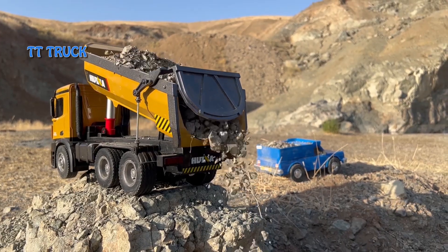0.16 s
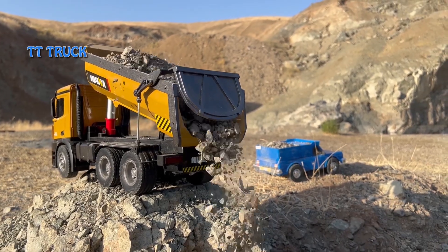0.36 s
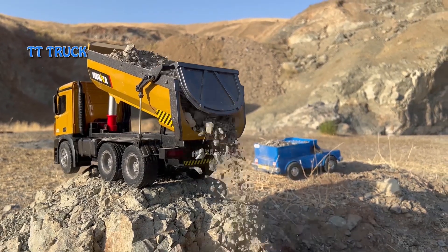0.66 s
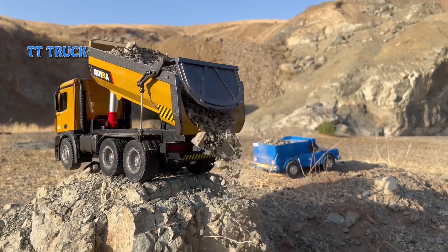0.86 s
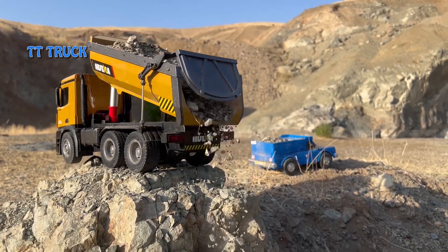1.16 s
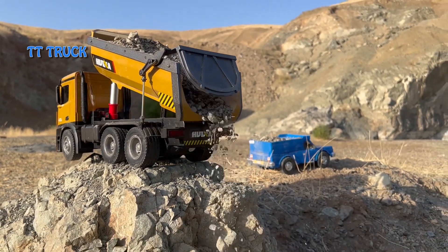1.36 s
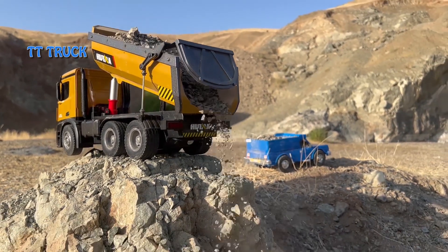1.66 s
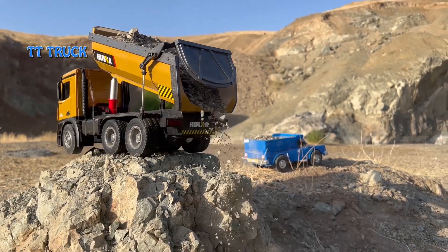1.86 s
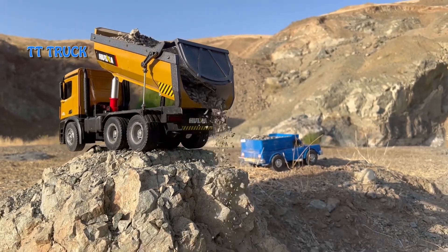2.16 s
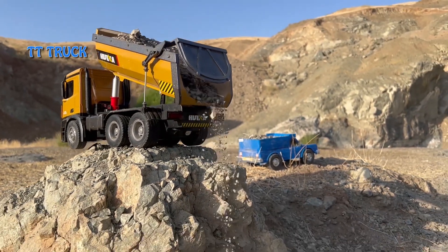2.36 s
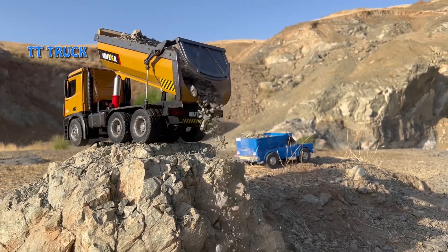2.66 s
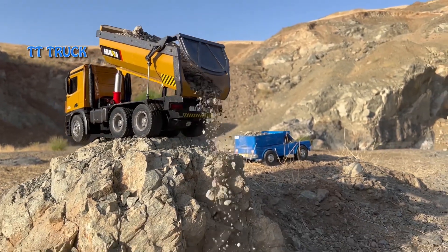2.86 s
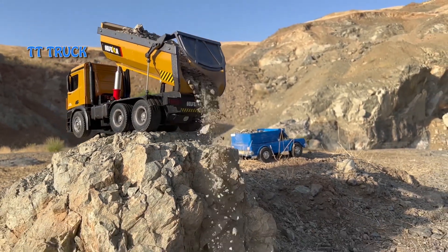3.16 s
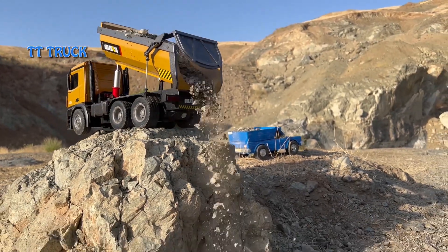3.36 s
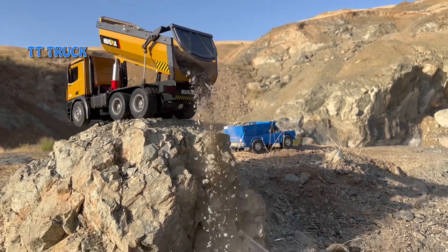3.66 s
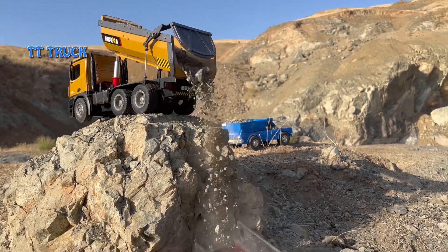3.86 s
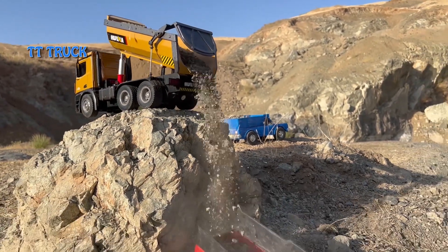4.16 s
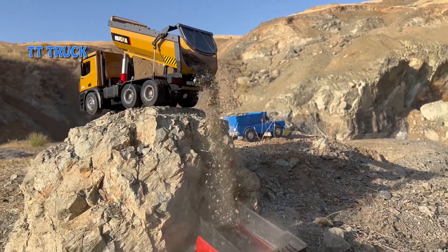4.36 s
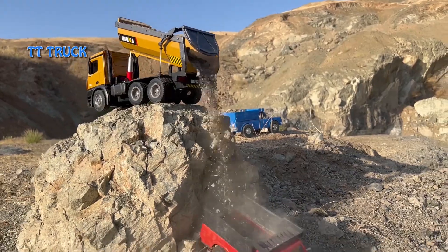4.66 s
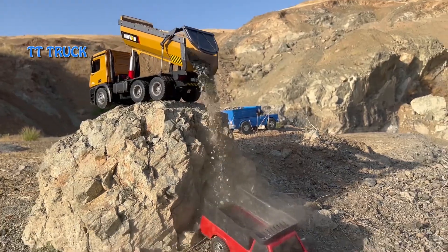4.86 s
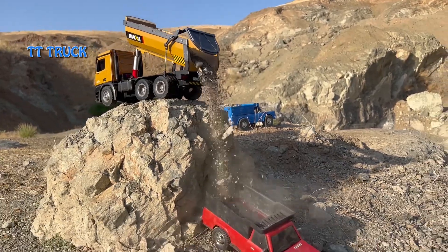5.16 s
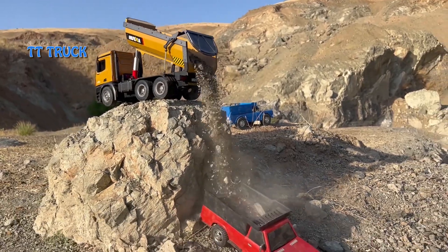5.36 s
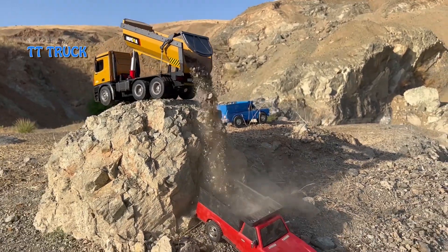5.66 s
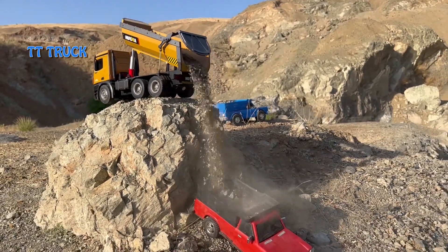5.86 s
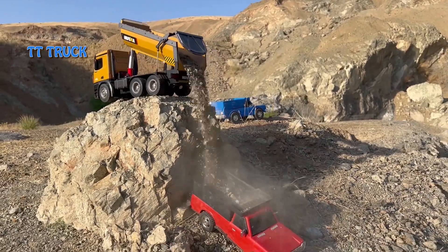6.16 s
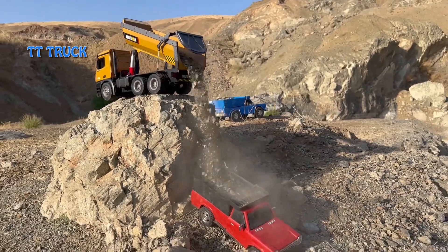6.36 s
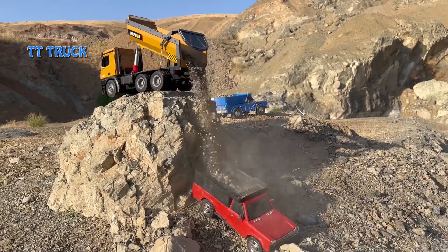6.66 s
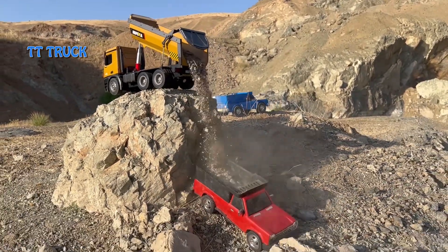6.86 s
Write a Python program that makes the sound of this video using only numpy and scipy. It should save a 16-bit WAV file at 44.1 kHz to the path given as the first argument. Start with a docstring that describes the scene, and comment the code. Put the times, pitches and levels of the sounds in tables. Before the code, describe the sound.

Small stones clatter densely against a rock face, sharp and dry with short woody thuds, while fine gravel hisses and ticks around them. The hollow toy truck bed rumbles softly, drifting slightly left. The clatter steadily weakens into scattered clicks, grit and a soft swish of sand near the end. It is open air with no obvious echo, heard close in stereo, with gentle low wind on the microphone.

```python
"""Stones knock hard in a tipped toy truck bed as gravel pours out of it, outdoors. Each knock is a blow that
rings a few resonances; pebbles, stones and grit are bursts of coloured noise. The load rumbles in the hollow
bed: noise through resonances that trade strength as it empties. Behind it, sand sifts, and wind blows on two
microphone ports as low noise with puffs that fall in pitch."""
import sys
import numpy as np
from scipy import signal
from scipy.fft import rfft, irfft, next_fast_len
from scipy.io import wavfile

SR = 44100
rng = np.random.default_rng(int(sys.argv[2]) if len(sys.argv) > 2 else 0)


def master(y):
    """Save y as 16-bit WAV."""
    cut = np.clip(np.atleast_2d(y).T, -1, 1)
    pcm = np.round(cut * 32767)  # scale
    wavfile.write(sys.argv[1], SR, pcm.astype(np.int16))


N = 309641   # length in samples, about 7 seconds


def from_db(db):
    """Decibels to gain."""
    return 10 ** (np.asarray(db) / 20)


def rms_one(x):
    """Scale to an average strength (rms) of 1."""
    return x / np.sqrt(np.mean(x ** 2) + 1e-20)


def in_time(rows):
    """Turn a table that starts with start_s into curves with one value a sample."""
    s, *columns = np.transpose(rows)
    return [np.interp(np.arange(N) / SR, s, column) for column in columns]


def colour(x, spectrum):
    """Filter with the given spectrum, sounding as early as it can (minimum phase)."""
    hz, db = np.transpose(spectrum)
    grid = np.maximum(np.arange(4097) * SR / 8192, 1)
    gain = from_db(np.interp(np.log(grid), np.log(hz), db))
    cepstrum = irfft(np.log(gain))
    # Folding the second half onto the first leaves no sound before time zero.
    cepstrum[1:4096] *= 2
    cepstrum[4097:] = 0
    response = irfft(np.exp(rfft(cepstrum)))
    return signal.oaconvolve(x, response[None], axes=1)[:, :N]


def resonance(x, hz, width_hz):
    """Ring at one pitch, with gain 1 at the top; a narrow width rings longer."""
    r = np.exp(-np.pi * width_hz / SR)
    top = np.array([1, 0, -1]) * (1 - r * r) / 2
    return signal.lfilter(top, [1, -2 * r * np.cos(2 * np.pi * hz / SR), r * r], x)


def contacts(per_s, spread_db, t60):
    """Envelope of random contacts of uneven size, each falling 60 dB in t60 seconds."""
    sizes = from_db(spread_db * np.minimum(rng.exponential(1, N), 3.2))
    hits = sizes * (rng.random(N) < per_s / SR)
    return rms_one(signal.lfilter([1], [1, -from_db(-60 / (t60 * SR))], hits + 1e-18))


def patter(envelope, hush_db):
    """Bursts of noise over a steady hush; two unrelated copies, for shared and scattered sound."""
    return (envelope + from_db(hush_db)) * rng.standard_normal((2, N))


# Larger stones landing: start_s [s], level_db [dB], stone_pitch_hz [Hz], ring_width_hz [Hz],
# thud_pitch_hz [Hz], thud_db and crack_db [dB relative to level_db]
LARGE_STONES = [(0.0055, -5, 1840, 400.0, 1000.0, -12, -16.0), (0.0093, -16, 1790, 260.0, 1000, -10, -27),
                (0.0197, -2, 1970, 140.0, 930, -3.5, -23), (0.0377, -6, 2150.0, 220.0, 970, -14.5, -13),
                (0.0788, -13.5, 2150, 300.0, 960, -2, -13), (0.0965, -9.5, 2010, 400.0, 895, -3, -16),
                (0.1448, -10, 2230, 350.0, 750.0, -13, -17), (0.1532, -15, 1970, 110.0, 644, -3.0, -17),
                (0.1597, -5.5, 1590, 260.0, 980.0, -7, -16), (0.1793, -21, 1510.0, 360.0, 710.0, -17, -8),
                (0.1846, -2.5, 4000, 420.0, 1000, -9, -16), (0.196, -13, 2280.0, 400.0, 605, -6, -9),
                (0.2399, 0.5, 2050, 120.0, 614, -10, -17), (0.2601, -2, 2010.0, 650.0, 1010, -4, -14.5),
                (0.2668, -4.0, 2200, 680.0, 950, -6, -17), (0.2803, -6, 2120.0, 270.0, 930.0, -15, -14),
                (0.2904, -6.5, 4300, 110.0, 930.0, -20, -10), (0.3091, -1, 2070, 270.0, 755, -5.5, -28),
                (0.3415, -19, 2100.0, 400.0, 950.0, -15, -20), (0.3495, -15, 2200.0, 500.0, 810, 3, -24),
                (0.3555, -7, 2070, 860.0, 980.0, -21, -25), (0.3689, -2.5, 2030, 400.0, 930, 1, -24),
                (0.3825, -23, 2000.0, 400.0, 894, -5, -7), (0.3995, -6, 2770.0, 760.0, 820, 6.5, -20),
                (0.4265, -3, 2120, 400.0, 900.0, -20, -21), (0.4301, -0.5, 1820, 380.0, 510.0, -32.0, -15),
                (0.4545, -13, 2010, 600, 950, -6, -17), (0.4639, -8, 2230.0, 540.0, 970.0, -8.0, -26),
                (0.472, -15, 2000.0, 400.0, 804, -3, -22), (0.4844, -1, 1670.0, 540.0, 716, -4, -15),
                (0.4922, -5, 1680.0, 350.0, 940.0, -5, -22.0), (0.5173, -7, 1710, 250.0, 930, 0, -32),
                (0.5367, 3.5, 1830, 300.0, 590, -7.5, -15.5), (0.5483, -5, 2110, 270.0, 1030.0, -19, -31),
                (0.5623, -20.5, 2160.0, 360.0, 930, 15.5, -33), (0.5685, -10, 2100, 400, 940, 5, -28),
                (0.5912, -11, 1400.0, 680.0, 930.0, -9, -35), (0.6124, -5, 2220.0, 400.0, 950, -1, -30),
                (0.6255, -7.5, 1690, 390.0, 970, -1.5, -34), (0.6491, -7, 2150.0, 160.0, 970.0, -25, -12),
                (0.6885, -11.5, 2220, 100.0, 950, -4, -4.5), (0.7239, -4, 1720.0, 500.0, 820, -18, -37),
                (0.7334, -9, 1600, 220.0, 805, -7, -13), (0.7505, -7, 3510.0, 680.0, 950.0, -18, -24),
                (0.8044, -19, 2270.0, 310.0, 930.0, -13, -8), (0.8118, -14, 4170, 130.0, 800.0, -11, -17),
                (0.8763, -25, 1710.0, 270.0, 1000, 12, -24.0),
                (0.9152, -7.5, 3690.0, 450.0, 1000.0, -9, -19),
                (0.9548, -13, 1580.0, 390.0, 810.0, -14, -16), (0.9852, -15, 2280, 500.0, 840.0, -9, -16),
                (0.9901, -6, 2250, 720.0, 804, -20, -17), (0.9978, -5.5, 2080.0, 590.0, 940, 1, -26.0),
                (1.0502, -12, 3110.0, 430.0, 960, -3, -20), (1.0585, -12, 1590, 200.0, 920, -3, -12),
                (1.086, -14, 1620, 260.0, 590, 0.5, -6), (1.1229, -24, 1720.0, 280.0, 920.0, -14, -1),
                (1.1354, -11, 1640, 610.0, 740, -8, -9), (1.1617, -13, 1670.0, 720.0, 884, 1, -9),
                (1.1685, 1, 2190, 420.0, 593, -10, -24), (1.1724, -17, 1600, 500, 850, 2, -18),
                (1.2136, -12.5, 1390.0, 480.0, 660.0, -16, -11),
                (1.2313, -18.5, 3650.0, 810.0, 800.0, -14, -9), (1.2831, -9.5, 4330, 650.0, 905, -2, -13.5),
                (1.2945, -15, 2080.0, 210.0, 660.0, -3.5, -26), (1.3111, -22, 1410, 120.0, 870, 1, -17.0),
                (1.3231, -25, 1550.0, 720.0, 930, 2, -9), (1.3445, -16.5, 2120, 140.0, 810.0, -3, -17),
                (1.355, -18, 3730.0, 480.0, 1020.0, -18, -13),
                (1.3753, -16.5, 2400.0, 390.0, 950.0, 3, -11), (1.3885, -17, 2240, 400, 947, -2, -17),
                (1.3969, -18, 2230.0, 810.0, 750.0, -25.0, -14), (1.4165, -27, 2380.0, 290.0, 890.0, -6, 0),
                (1.4289, 2, 2060, 1400.0, 650, -9, -21), (1.4298, -11, 4200, 700, 950, -8, -25),
                (1.4432, -25, 3900.0, 1200.0, 900, -11, -10), (1.48, -12, 1800.0, 520.0, 826, 2, -26),
                (1.5287, -22, 2240, 90.0, 930.0, -13, -4), (1.5531, -23.5, 2200.0, 520.0, 950, 5, -15.0),
                (1.6071, -19, 2050, 300.0, 940, -2, -7), (1.6345, -16.5, 4200, 200.0, 990, -19, -14),
                (1.6415, -21.5, 1540, 420.0, 830, 7, -22), (1.7379, -17, 2060.0, 720.0, 980, -5, -14),
                (1.8024, -24, 1600, 350.0, 930, 9, -25), (1.8283, -21, 1670.0, 560.0, 930, 1, -7.5),
                (1.9045, -14.5, 1980, 810.0, 950, -8, -13), (1.9851, -23, 1570.0, 380.0, 1000.0, -15, -13),
                (2.0547, -27, 4120.0, 480.0, 940.0, -15, -9), (2.3057, -19.5, 1570, 150.0, 960.0, -19, -29),
                (2.3341, -15, 1730, 450.0, 724, -5.5, -19), (2.4368, -23, 1590.0, 390.0, 680.0, -3, -24),
                (2.4598, -15.5, 1570, 260.0, 1000, -8, -25), (2.4751, -16, 4300, 110.0, 824, -7, -13.5),
                (2.5953, -22, 1660, 400, 900, -6, -19), (2.6447, -21.5, 1540.0, 290.0, 610.0, -15, -10.5),
                (2.6607, -8.5, 1680, 310.0, 920, -6, -29), (2.6731, -14, 4000, 260.0, 940.0, -6, -22),
                (2.7878, -20, 1480, 400, 800, -16, -8), (2.8538, -15, 1600, 370.0, 975, 1, -34),
                (2.9545, -20, 1600, 400, 900, -11, -22), (2.975, -18, 1610, 560.0, 950, 2.5, -25.0),
                (3.0801, -23.5, 1520, 540.0, 970.0, -8, -9),
                (3.1683, -17.5, 3700, 360.0, 810.0, -16, -14.5), (3.2373, -26, 3680, 340.0, 620.0, -6, -18),
                (3.3298, 0.5, 1620, 230.0, 1070, -5.5, -36), (3.3941, -24.5, 1950.0, 560.0, 930.0, 6, -3),
                (3.4068, -21.5, 1950, 160.0, 1050, 4, -23.0), (3.4859, -17.5, 1550, 270.0, 960.0, -19, -18),
                (3.5047, -28, 1670.0, 310.0, 990.0, 1, -22), (3.5369, -20, 2090.0, 610.0, 910, 6.5, -24),
                (3.5525, -25, 2020, 400, 1010, -10, -18), (3.6286, -14.5, 2920.0, 720.0, 1040, -10, -24),
                (3.6654, -20, 1600, 230.0, 775, 2.5, -8.5), (3.7803, -19, 1680, 310.0, 590.0, -8, -22),
                (3.8651, -19, 1650.0, 650.0, 1010.0, -8, -25),
                (4.039, -19, 1670.0, 680.0, 980.0, -17, -12.5),
                (4.0603, -21, 1640.0, 810.0, 1040.0, -9, -27), (4.0809, -29, 1540.0, 680.0, 786, 7, -25.0),
                (4.099, -3.5, 2860, 2380, 695, -4, -43), (4.1022, -9.5, 1750, 260.0, 690, -25, -32),
                (4.1941, -29.5, 1610.0, 400.0, 840, 5.5, -20.0), (4.2292, -23.5, 3600, 150.0, 960, -2, -12),
                (4.3024, -23.5, 1720.0, 610.0, 1030.0, -10, -10),
                (4.4439, -17.5, 2300, 1500.0, 1040.0, -12, -31), (4.582, -25, 2030, 760.0, 830, 2.5, -20),
                (4.6529, -23, 1990.0, 400.0, 544, -6, -15), (4.6918, -26.5, 1900, 90.0, 540, -1, -7),
                (4.7119, -20.5, 2860, 590.0, 700.0, -3, -23), (4.7597, -25, 1650.0, 360.0, 910, 4, -20),
                (5.0515, -27, 2040, 240.0, 840.0, -12, -22), (5.0569, -23.5, 2120, 290.0, 930, 3, -24),
                (5.2513, -24, 4000, 350.0, 676, -4, -5.5), (5.3418, -24.5, 2010, 180.0, 580, 8.5, -13),
                (5.3498, -31.5, 1260.0, 720.0, 704, 20, -13.0), (5.4014, -25, 2860.0, 760.0, 1050, 2, -15),
                (5.4277, -19.5, 2840, 590.0, 960.0, -5, -10.5),
                (5.4644, -25, 4030.0, 720.0, 800.0, -2, -10), (5.6996, -32, 3600, 370.0, 583, -7, -9),
                (5.7084, -34, 2010.0, 590.0, 830.0, 5, -1), (5.7302, -25, 3900, 520.0, 690.0, -10, -20),
                (5.805, -29.5, 3900, 600, 800, -6, -12), (5.871, -27, 2930, 900.0, 610.0, -9, -12),
                (5.914, -34, 2000, 900, 800, -6, -7), (5.962, -30, 1500, 600, 844, -2, -9),
                (5.992, -32, 1600, 600, 850, -4, -13), (6.1575, -26, 3730, 610.0, 670.0, -6, -13),
                (6.179, -38, 1900.0, 400.0, 355, 9, -2), (6.2466, -25, 1850, 270.0, 950, 0, -14),
                (6.2921, -27, 4040, 170.0, 870, -1, -14), (6.384, -42, 1900.0, 400.0, 334, 12.5, -12.0),
                (6.3985, -33, 3000.0, 700.0, 695, 8, -3.5), (6.4358, -37, 1590, 180.0, 620.0, 11, -1),
                (6.622, -29.5, 2500, 290.0, 705, -5, -12), (6.6581, -33, 4020.0, 190.0, 860.0, -2.0, -17.0),
                (6.7316, -25.5, 3150, 760.0, 680.0, -23.0, -21), (6.9265, -36.5, 3000.0, 800.0, 655, 5, -7)]
# What every blow rings besides the stone, low and high: pitch_hz [Hz], width_hz [Hz], level_db [dB]
THUD_MODES = [(468, 89, -16.5), (628, 52, -5.5), (882, 20, -7.5)]
SNAP_MODES = [(1600, 47, -13), (2150, 290, -13), (3600, 1050, -19)]
UNEVEN_DB = -6.5   # size of the random change in a mode's share from blow to blow; the sign is immaterial


def ring_modes(blow, modes):
    """One blow rings several resonances, in shares that vary at random."""
    return sum(from_db(db + UNEVEN_DB * rng.standard_normal()) * resonance(blow, hz, width)
               for hz, width, db in modes)


def knocks(rows):
    """A soft-edged blow with a noisy tail rings the stone and damped modes; a short crack lies on top."""
    size = 3000   # samples kept for each knock
    rung, crack = np.zeros((2, N + size)), np.zeros(N + size)
    t = np.arange(size) / SR
    contact = signal.butter(2, 4200, fs=SR)   # the contact lasts a fraction of a millisecond
    for s, db, stone_hz, width_hz, thud_hz, thud_db, crack_db in rows:
        rebounds = 0.045 * rng.standard_normal((2, size)) * from_db(-60 * t / 0.016)
        blow = rebounds + [[1], [.3]] * (np.arange(size) == 1)
        blow = signal.lfilter(*contact, blow)
        low = ring_modes(blow, THUD_MODES)
        high = ring_modes(blow, SNAP_MODES) + resonance(blow, stone_hz, max(width_hz, 40))
        low = low + resonance(blow, thud_hz, 0.15 * thud_hz)
        low = np.roll(low, 24, axis=1)   # the thud comes half a millisecond late
        thud = from_db(thud_db) * low / abs(low[0]).max()
        ring = high / abs(high[0]).max()
        at = max(round(s * SR) - 4, 0)
        rung[:, at:at + size] += from_db(db) * (thud + ring)
        crack[at:at + size] += from_db(db + crack_db - 60 * (t - .0015) / 0.015)
    no_bass = signal.butter(2, 300, "high", fs=SR, output="sos")   # small stones have no bass
    rung = signal.sosfilt(no_bass, rung)
    return rung[:, :N] + crack[:N] * rms_one(colour(rng.standard_normal((2, N)), GRIT_COLOUR))


MEAN_FLOW_DB = -34.5   # flow at which pebbles and grit have their set levels
PEBBLES_PER_S, PEBBLE_DB, PEBBLE_SPREAD_DB = 55, -28.5, 3.5   # level at mean flow, give or take the spread
PEBBLE_FOLLOWS = 0.81   # share of the flow's swing in dB
PEBBLE_WIDTH_HZ, PEBBLE_THUD_DB, PEBBLE_CRACK_DB = 350, -40, -8


def landings(flow_db):
    """The larger stones, and pebbles at random times whose strength follows the flow."""
    gap, size, pitch, depth = rng.random((600, 4)).T
    start_s = np.cumsum(-np.log(gap) / PEBBLES_PER_S)
    flow = flow_db[np.minimum(start_s * SR, N - 1).astype(int)] - MEAN_FLOW_DB
    level_db = PEBBLE_DB + PEBBLE_FOLLOWS * flow + PEBBLE_SPREAD_DB * (2 * size - 1)
    stone_hz = 1450 * 2 ** (1.5 * pitch ** 2)
    thud_hz = 600 * 2 ** (1.2 * depth)
    pebbles = [(s, db, hz, PEBBLE_WIDTH_HZ, low_hz, PEBBLE_THUD_DB, PEBBLE_CRACK_DB)
               for s, db, hz, low_hz in zip(start_s, level_db, stone_hz, thud_hz) if s < N / SR]
    return LARGE_STONES + pebbles


SWELL_SHARE = 0.37   # share of the dB by which a large stone exceeds the flow
SWELL_LEAD_S = 0.0028   # seconds the swell begins before the knock
SWELL_T60_S = 0.028   # time for each of two smoothing stages to fall 60 dB


def knock_swells(rows, flow_db):
    """Envelope of the noise that swells and fades around each large stone's knock."""
    s, db = np.transpose([row[:2] for row in rows])
    at = (np.maximum(s - SWELL_LEAD_S, 0) * SR).astype(int)
    clicks = np.full(N, 1e-18)
    clicks[at] = from_db(SWELL_SHARE * (db - flow_db[at]))
    r = from_db(-60 / (SWELL_T60_S * SR))
    return rms_one(signal.lfilter([1], [1, -2 * r, r * r], clicks))


# Tone of the stones: pitch_hz [Hz], density_db [dB per Hz]
STONE_COLOUR = [(200, -29), (400, -18), (600, -2), (950, 0.5), (1250, -12), (1700, -3.5), (2150, -6.5),
                (2800, -12), (3700, -3.5), (5100, -11.5), (6400, -20), (8000, -8), (10500, -23.5),
                (16500, -17.5)]


def stones(level_db, landing):
    """Heavy stones sound duller and last longer than light ones; chips only click."""
    heavy = patter(contacts(110, spread_db=2.0, t60=0.054) + 1.46 * landing, hush_db=-7.0)
    heavy = signal.sosfilt(signal.butter(1, 2200, fs=SR, output="sos"), heavy)
    chips = contacts(200, spread_db=7.0, t60=0.00044) * np.array([[1], [.3]])   # single hard clicks
    light = patter(landing, hush_db=-41) + 0.58 * chips
    light = signal.sosfilt(signal.butter(1, 1800, "high", fs=SR, output="sos"), light)
    mixed = rms_one(heavy) + from_db(-3.0) * rms_one(light)
    return from_db(level_db) * rms_one(colour(mixed, STONE_COLOUR))


# Tone of fine gravel, also used for the cracks: pitch_hz [Hz], density_db [dB per Hz]
GRIT_COLOUR = [(800, -26.5), (2000, 1), (3500, 3), (4800, -9.5), (6300, 3.5), (7400, 0.5), (9800, -2),
               (11800, -1), (16500, -2.5)]
GRIT_DB, GRIT_FOLLOWS = -39.5, 0.95   # level at mean flow once arrived; share of the flow's swing in dB
GRIT_STARTS_S, GRIT_RISE_S = 0.18, 0.1   # the fine gravel is faint until after the first stones


def grit(flow_db, landing):
    """Fine gravel: short bright ticks, many thrown up by the landing stones, over a hiss."""
    arrived = np.clip((np.arange(N) / SR - GRIT_STARTS_S) / GRIT_RISE_S, .1, 1)
    ticks = patter(0.45 * landing + 1.47 * contacts(250, spread_db=-4.0, t60=0.00099), hush_db=1.5)
    level_db = GRIT_DB + GRIT_FOLLOWS * (flow_db - MEAN_FLOW_DB)
    return arrived * from_db(level_db) * rms_one(colour(ticks, GRIT_COLOUR))


# Hollow bed: pitch_hz [Hz], width_hz [Hz], full_db [dB when full], gain_db [dB gained as it empties]
BED_MODES = [(590, 47, 1.5, -0.7), (620, 20, 6.5, -3.5), (675, 16.7, 1.4, 4.5), (751, 23, -2.3, 2.5),
             (829.3, 30, -4, 10.5), (880, 38, 0, 2), (930, 59, 1, -2), (1000, 66, 4.5, -8.5),
             (1084, 106, -17, 7)]


def rumble(level_db):
    """The sliding load drives the air and walls of the bed."""
    slide = patter(contacts(300, spread_db=1.0, t60=0.033), hush_db=0.0)
    emptied = np.arange(N) / N   # the modes trade strength steadily as the bed empties
    rung = np.zeros((2, N))
    for k, (hz, width, full_db, gain_db) in enumerate(BED_MODES):
        sign = (-1) ** k   # neighbouring modes have opposite signs
        rung += from_db(full_db + gain_db * emptied) * sign * resonance(slide, hz, width)
    rung = signal.sosfilt(signal.butter(2, [480, 1400], "band", fs=SR, output="sos"), rung)
    return from_db(level_db) * rms_one(rung)


# Tone of sifting sand: pitch_hz [Hz], density_db [dB per Hz]
SAND_COLOUR = [(88, -43), (150, -10.5), (414, -17), (675, -39), (1500, -30), (2000, -9), (3600, -7),
               (7920, -18), (10200, -31), (12000, -7), (16000, -17)]
# Strength of the sand: start_s [s], level_db [dB]
SAND_LEVEL = [(0, -65), (5.9, -50.5), (6.1, -55), (6.3, -53), (6.45, -45.5), (6.65, -55.5), (7.02, -56)]


def sand():
    """Sifting sand is a soft noise whose level rises and falls."""
    return from_db(in_time(SAND_LEVEL)[0]) * rms_one(colour(rng.standard_normal((2, N)), SAND_COLOUR))


# Strength of the breeze: start_s [s], level_db [dB]
BREEZE = [(0.0, -37), (0.2, -47), (0.36, -41), (0.6, -48), (1.1, -59), (1.7, -58.5), (2.12, -50),
          (2.3, -63), (2.55, -54), (2.8, -59.5), (3.35, -63.5), (3.55, -54), (3.9, -60.5), (4.25, -51.5),
          (4.6, -50.5), (5.15, -63), (6.1, -58), (6.4, -60), (6.7, -56), (7.02, -56)]
# Tone of the breeze: pitch_hz [Hz], density_db [dB per Hz]
BREEZE_COLOUR = [(12, -41), (20, -29), (42, 0.5), (65, 5), (118, 2), (176, -8), (238, -12), (450, -14),
                 (580, -46), (990, -120)]
# Wind puffs: start_s [s], level_db [dB], pitch_hz [Hz, reached about 2 ms after the start]
WIND_PUFFS = [(0.25, -31, 130), (0.326, -27.5, 225), (0.363, -31, 120), (0.457, -26, 234),
              (0.81, -30.5, 340), (0.953, -29.5, 346), (1.317, -40, 296), (1.776, -43, 244),
              (2.009, -41, 200), (2.075, -37, 170), (2.099, -38, 202), (2.144, -36, 280), (2.512, -43, 298),
              (2.535, -41, 109), (2.606, -42, 208), (6.197, -47, 150), (6.625, -46, 110), (6.766, -48, 148)]
WAKE_DB, WAKE_S = -12, 0.013   # rumble trailing each puff: level against the puff, time to its peak


def wind():
    """Lumpy low noise, and puffs that sweep down in pitch as they pass the ports."""
    lumps = patter(contacts(22, spread_db=-10.0, t60=0.11), hush_db=-0.5)
    lumpy = rms_one(colour(lumps, BREEZE_COLOUR))
    t, strength, sweeps = np.arange(N) / SR, from_db(in_time(BREEZE)[0]), np.zeros((2, N))
    for s, db, hz in WIND_PUFFS:
        age = np.maximum(t - s, 0)
        turns = 70 * age + (hz - 70) * 0.0101 * (1 - np.exp(-age / 0.0075))   # settles at 70 Hz
        swell = (age / 0.007) * np.exp(1 - age / 0.0075)
        sweeps[0] += from_db(db) * np.sin(2 * np.pi * turns) * swell
        strength = strength + from_db(db + WAKE_DB) * (age / WAKE_S) * np.exp(1 - age / WAKE_S)
    return strength * lumpy + sweeps


# Which port hears first: pitch_hz [Hz], left_lead_rad [radians]
PORT_LEAD = [(0, 0), (690, .5), (1600, -.5), (2500, .2), (3190, 1.6), (4310, .6), (4740, .3), (5340, 2.4),
             (6030, 1.6), (6600, -.3), (7500, -.4), (8300, -1), (9130, -2.5), (9730, -3.1), (10700, -3.4),
             (12700, -6.1), (13800, -6.3), (16100, -9)]
# Which port is louder: pitch_hz [Hz], left_minus_right_db [dB]
PORT_LEAN = [(300, 0), (900, 1), (1700, 1.5), (2100, -1), (2900, -2.5), (3500, 3.5), (4800, 1), (6300, 8),
             (7200, 1.5), (9200, 0)]
# How alike the ports are: pitch_hz [Hz], likeness [0 unrelated, 1 the same]
PORT_LIKENESS = [(100, 0.8), (500, 0.96), (2200, 0.77), (3000, 0.63), (4000, 1), (4900, 0.12), (6200, 0.86),
                 (7200, 0.65), (8700, 0.77), (10200, 1), (12000, 0.61), (13500, 0.51), (15000, 1)]


def ports(pair):
    """Shared and scattered sound reach two spaced ports with a lead and a lean that change with pitch."""
    size = next_fast_len(N + 2000)
    hz = np.arange(size // 2 + 1) * SR / size
    shared, scattered = rfft(pair, size)
    alike = np.clip(np.interp(hz, *np.transpose(PORT_LIKENESS)), 0, 1)
    lean_db = np.interp(hz, *np.transpose(PORT_LEAN))
    lead = np.interp(hz, *np.transpose(PORT_LEAD))
    half = from_db(lean_db / 2) * np.exp(.5j * lead)   # each port takes half of the difference
    shared = shared * np.sqrt((1 + alike) / 2)
    scattered = scattered * np.sqrt((1 - alike) / 2)
    left, right = (shared + scattered) * half, (shared - scattered) / half
    return irfft(np.array([left, right]), size)[:, :N]


# The pour: start_s [s], flow_db [dB, level of the stones], bed_db [dB, level of the rumble]
POUR_LEVELS = [(0.0, -16, -18), (0.065, -33, -32), (0.16, -20, -31), (0.23, -27, -31), (0.3, -19, -27),
               (0.425, -17.5, -53), (0.447, -27.5, -49), (0.485, -18, -40), (0.55, -20, -44),
               (0.76, -23, -44), (1.06, -26, -33), (1.37, -33.5, -34.5), (1.64, -33, -39),
               (2.17, -37.5, -35.5), (2.6, -37.5, -35.5), (2.87, -33.5, -34.5), (3.19, -37.5, -37.5),
               (3.64, -32, -36.5), (3.95, -37, -35.5), (4.57, -40, -39), (4.8, -39, -39.5), (5.4, -44, -38),
               (6.0, -51, -38.5), (6.4, -47.5, -39), (7.02, -46.5, -40)]


def scene():
    """Stones land while the bed rumbles a little to their left, in the wind."""
    flow_db, bed_db = in_time(POUR_LEVELS)
    landing = contacts(180, spread_db=5.0, t60=0.013) + 0.64 * knock_swells(LARGE_STONES, flow_db)
    falling = knocks(landings(flow_db)) + stones(flow_db, landing) + grit(flow_db, landing) + sand()
    lean_db = 0.5 + 0.39 * np.arange(N) / SR   # the bed drifts further left
    bed = ports(rumble(bed_db)) * from_db([lean_db, -lean_db])
    return bed + ports(falling + wind())


CUTOFF_HZ = 15800   # almost nothing sounds above this pitch


def record(dry):
    """Peaks are rounded, then the top is cut steeply."""
    top_cut = signal.ellip(12, .5, 60, CUTOFF_HZ, fs=SR, output="sos")
    return signal.sosfilt(top_cut, np.tanh(dry))


dry = scene()
out = record(dry)
master(out)
```